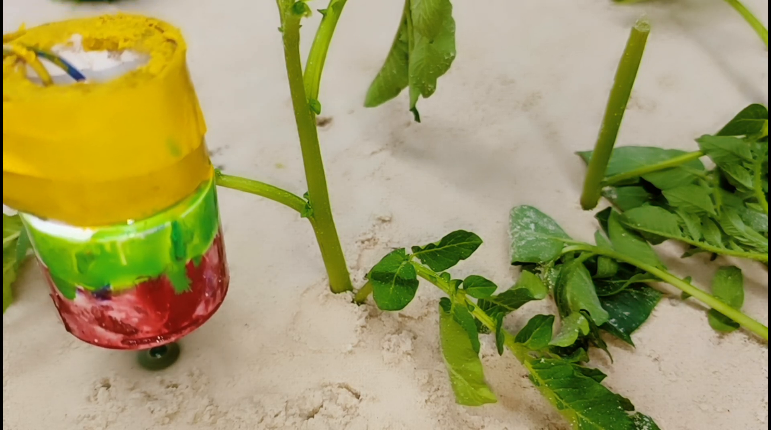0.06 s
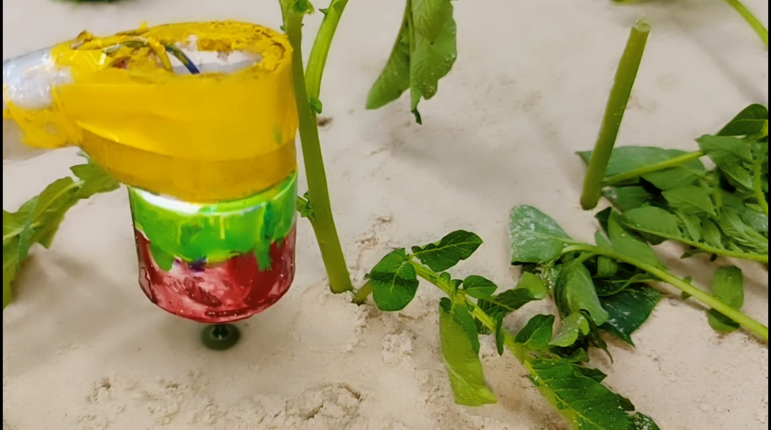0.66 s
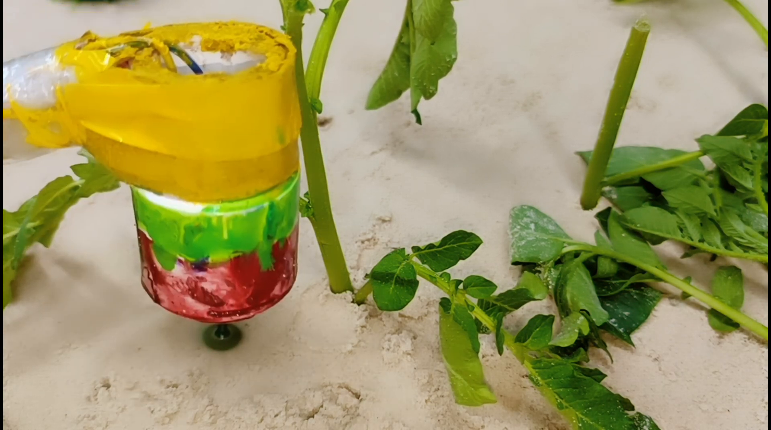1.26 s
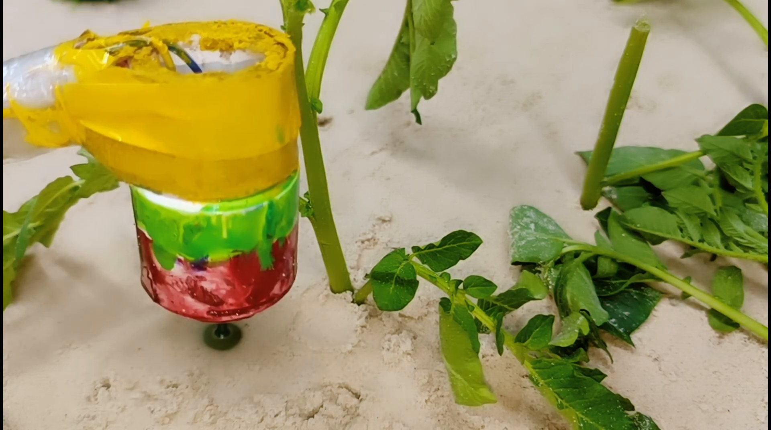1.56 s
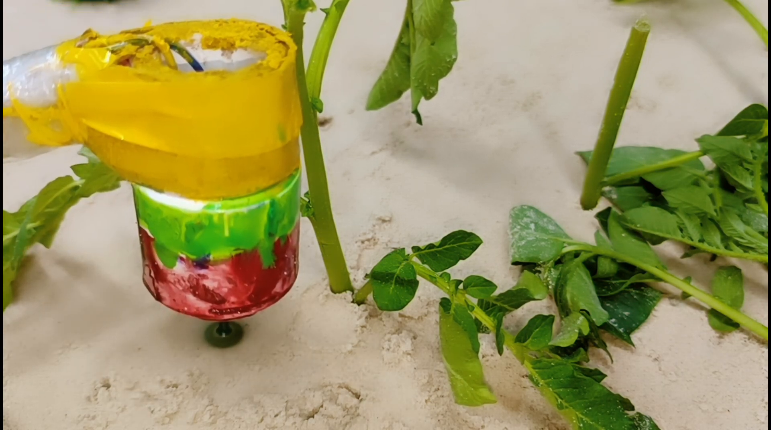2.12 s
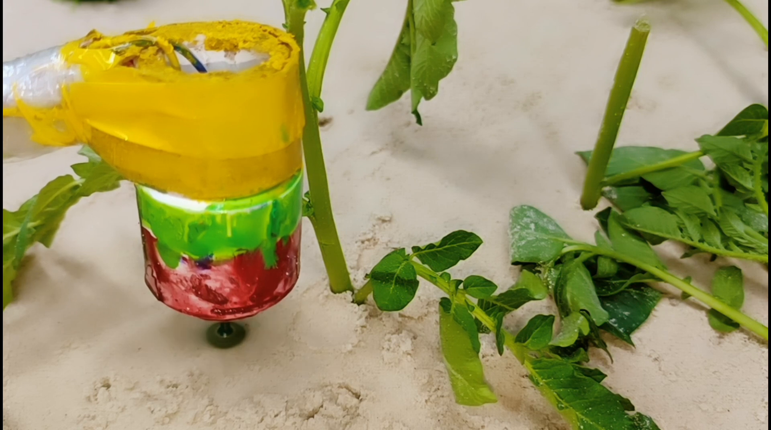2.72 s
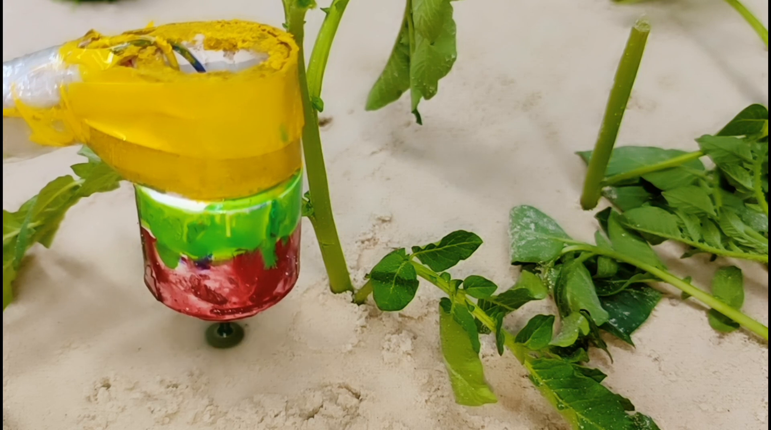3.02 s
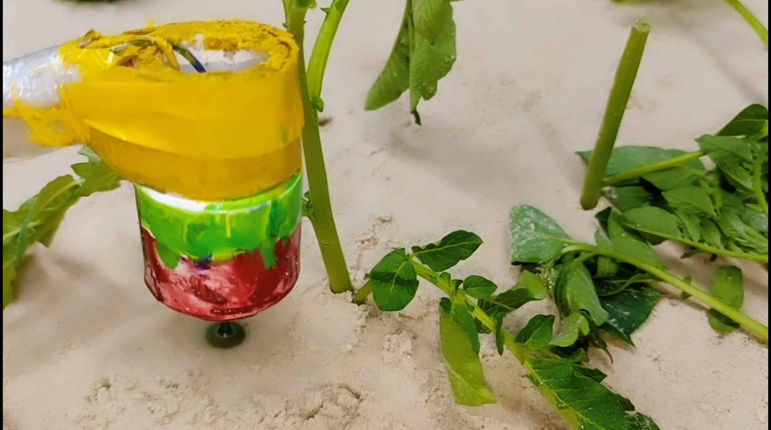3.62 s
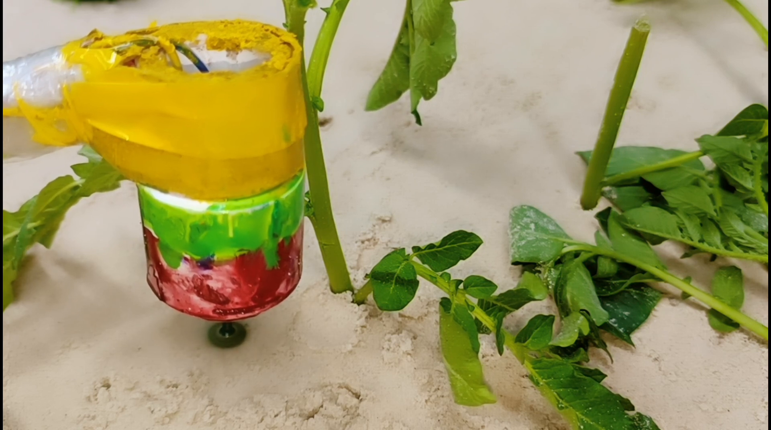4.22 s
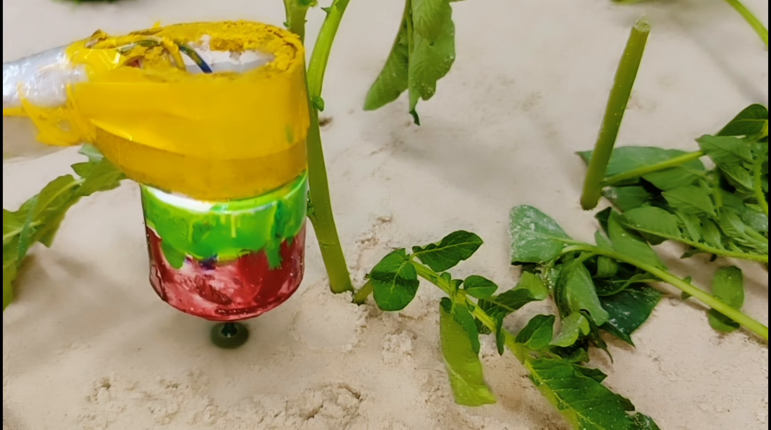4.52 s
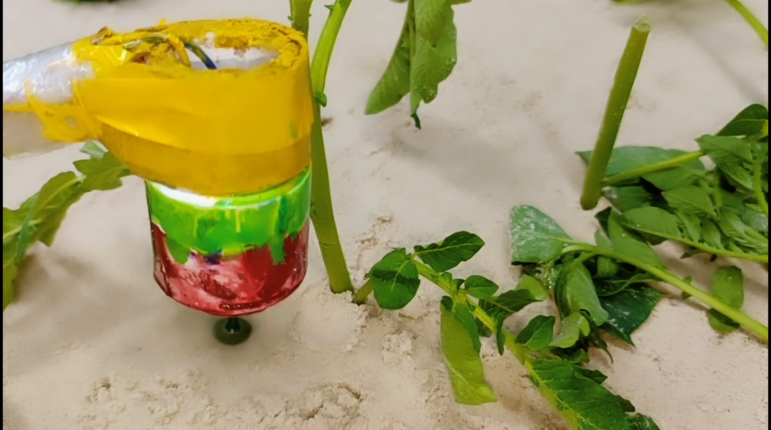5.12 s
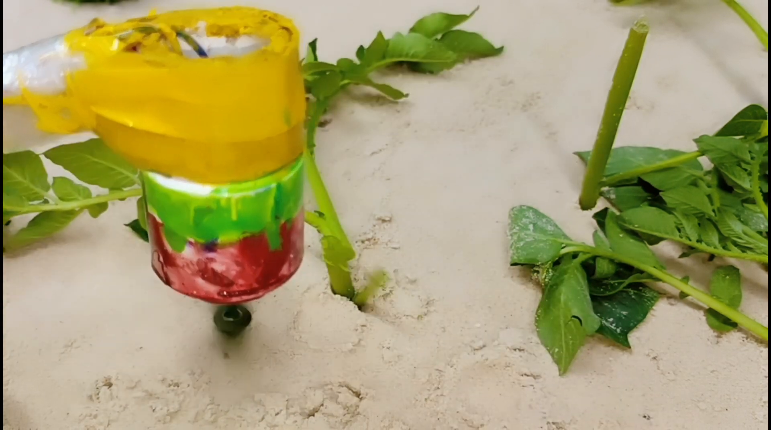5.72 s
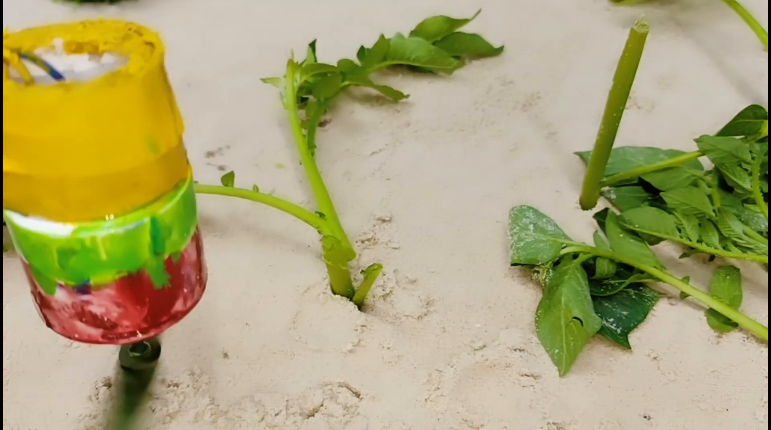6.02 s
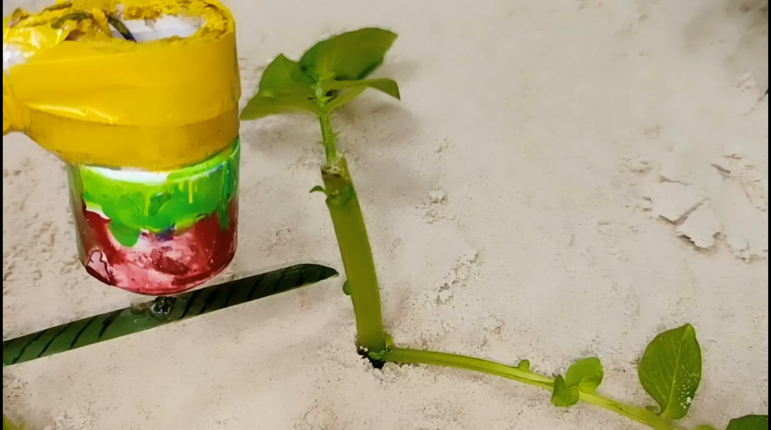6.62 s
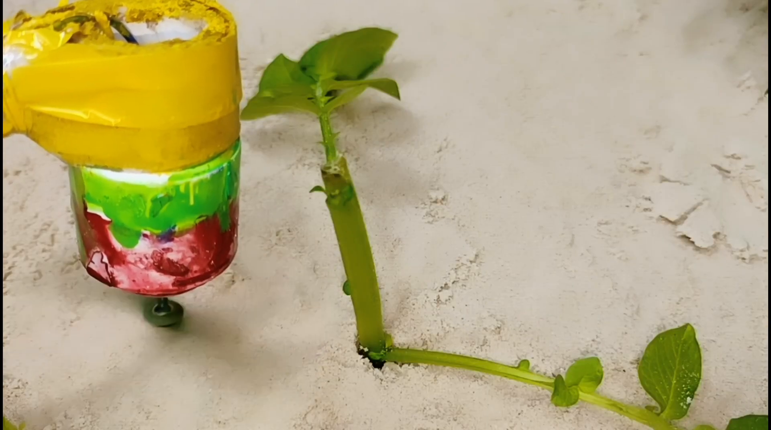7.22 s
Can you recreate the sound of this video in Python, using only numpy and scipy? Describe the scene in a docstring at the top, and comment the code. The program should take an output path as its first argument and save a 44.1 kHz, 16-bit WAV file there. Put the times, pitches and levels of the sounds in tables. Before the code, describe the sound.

Very close and with almost no echo, a spinning blade beats the air in a fast, even flutter while its little motor's gears whine and rattle. Then it bites into a plant stem and labours, slowing slightly as knocking and tiny squeals replace the whine. Everything stops abruptly for an instant, and the motor starts again, a raspy whirr climbing in pitch.

```python
"""A small geared motor swings a cutter blade close to the microphone: two thumps of air a turn, over a
gear whine and a rattling hiss. From about 4 s a plant stem drags on the blade: it slows, the first
thump dulls, the whine fades, and a knock and a squeal grow. Near 6.5 s the sound stops. After a short
silence the motor runs up again, its gear teeth and brushes making a bright, rough whirr."""
import sys
import numpy as np
from scipy import signal
from scipy.fft import rfft, irfft
from scipy.io import wavfile
from scipy.ndimage import uniform_filter1d

SR = 44100
rng = np.random.default_rng(int(sys.argv[2]) if len(sys.argv) > 2 else 0)


def to_wav(s):
    """Save 16-bit WAV."""
    ch = np.atleast_2d(s).T  # columns
    pcm = np.round(np.clip(ch, -1, 1) * 32767)  # PCM
    wavfile.write(sys.argv[1], SR, pcm.astype(np.int16))


N = 324576
T = np.arange(N) / SR
CUT_S, STOP_S, RESTART_S = 5.42, 6.468, 6.635
FREE_SPEED, LABOURED_SPEED = 16.42, 13.25  # turns a second at load 0 and at load 1
TEETH_PER_TURN, PINION_TEETH = 87.2, 9

# The blade's speed. Each row: time in seconds, turns a second.
BLADE_SPEED = [(0, 16.493), (1.729, 16.483), (2.825, 16.345), (4.083, 16.424), (4.964, 14.432),
               (5.412, 13.723), (5.892, 13.307), (6.47, 13.253)]

# Noise colours. Each row: frequency in Hz, relative level in dB.
WASH_COLOUR = [(20, 0), (70, 1), (130, -10), (175, -3), (220, -7.5), (290, -3.5), (550, -0.5), (780, -13),
               (1000, -11), (1250, -10), (2000, -21.5), (5000, -63)]  # stirred air
DRAUGHT_COLOUR = [(20, 4.5), (60, 2), (150, -16), (300, -13.5), (1000, -41)]  # wind on the microphone
RATTLE_COLOUR = [(500, -5.5), (840, -9), (940, 2), (1050, -2), (1700, -5.5), (2050, 1), (3050, -3),
                 (3380, 1), (3700, -5), (5000, -6.5), (7600, -8), (9000, -11), (11400, -13), (13000, -9),
                 (15500, -15)]  # clattering gears
RASP_COLOUR = [(800, -36), (1500, 12), (2000, 16), (3200, 9), (3900, -11.5), (7000, -26), (15000, -32)]  # rubbing gears
TICK_COLOUR = [(1200, -20), (2500, -12), (4200, 6.5), (5500, 7), (7500, -1), (9000, -15.5), (14000, -3)]  # gear play snapping shut
CHATTER_COLOUR = [(24, -30), (40, -2), (90, -5.5), (170, -10.5), (230, -15.5), (333, -3), (881, -12),
                  (998, -3.5), (1130, -8.5), (1490, -9.5), (1820, -12), (2400, -1), (3200, -9.5),
                  (3700, -6), (4200, -4), (4800, -7), (7400, -5.5), (7900, -7), (8400, -9), (13700, -10),
                  (15500, -18)]  # teeth in the run-up
BRUSH_COLOUR = [(3000, -30), (6000, -2), (9000, -2), (11800, -9), (13500, 7), (15500, -6)]  # motor brushes

# The rattle's stereo spread. Each row: frequency in Hz, left minus right in dB.
RATTLE_PAN = [(1000, 4), (2600, 0), (3600, -5), (4500, 2), (5700, 1.5), (7500, 6.5), (8600, -0.5),
              (12500, -0.5), (14000, -2.5)]
# Faders that ride the load. Each row: load from 0 to 1, base level in dB.
RATTLE_BY_LOAD = [(0, -27), (.3, -29), (.6, -27.5), (1, -26.5)]
CHIRPS_BY_LOAD = [(0, -36), (.3, -35), (.6, -32), (.9, -32.5), (1, -33)]
WHINE_BY_LOAD = [(0, -28.5), (.33, -31), (.52, -32), (.66, -54), (1, -38)]
# Ticks of the gear play. Each row: place in the turn, decay in turns, base level in dB.
TICKS = [(-.305, 0.019, -19), (.008, 0.011, -26)]
# Squeals in the stem. Each row: peak time in seconds, tooth rate in Hz, glide in % a ms, level in dB.
SQUEALS = [(4.83, 950, 0, -25), (5.0355, 1050, 1, -23), (5.089, 970, -5, -18.5), (5.1025, 760, 0, -23),
           (5.176, 990, 3.5, -13), (5.304, 880, -11, -22), (5.396, 980, 1, -19), (5.668, 907, -3, -16),
           (5.743, 949.3, -5.5, -16), (5.819, 940, -6, -15), (5.892, 1000, -2, -18),
           (5.967, 1000, -6, -12.5), (6.0426, 960, -7, -14), (6.1173, 980, -4.5, -13),
           (6.193, 965, -5.5, -14.5), (6.2686, 960, -3.5, -15), (6.343, 1020, -7, -10.5),
           (6.4187, 934, -8, -9)]
# A squeal's partials. Each row: multiple of the tooth rate, relative level in dB.
SQUEAL_HARMONICS = [(2, -6), (3, -4.5), (4, -12), (6, -14)]

# Puffs of air in the run-up. Each row: peak time in seconds, width in seconds, level in dB.
BUFFETS = [(6.66, 0.019, -20.5), (7.068, 0.0099, -19.5)]
# Run-up tones. Each row: multiple of the tooth rate, trim in dB under strain, trim in dB running free.
TOOTH_HARMONICS = [(1, -1.5, 1.5), (2, -0.5, 0.5), (3, -4.5, 1.5), (4, -6, 0), (5, -4, 0), (6, 1.5, 4),
                   (7, 0, 6), (8, -1, -1), (9, 1.5, -4)]
# The housing's EQ on those tones. Each row: frequency in Hz, gain in dB.
HOUSING_EQ = [(850, -16), (1000, 7.5), (1250, -2.5), (1600, -7), (1900, 0), (2300, -1.5), (2600, 4),
              (3300, 1), (3700, -2), (4300, 4), (4800, -7), (5200, 4), (5600, 2), (6100, -1.5),
              (7000, -0.5), (7900, 2), (8300, -8), (9000, -6), (14000, -14)]
# The shaft's hum. Each row: multiple of the shaft rate, level in dB at full speed.
SHAFT_HARMONICS = [(2, -37), (3, -40)]

# Hits ahead of the heavy thump. Each row: time in seconds, lead in ms, pitch in Hz, base level in dB.
LIGHT_THUMP = [(.8, 15.2, 535, -8.5), (2.5, 15.3, 562, -7.5), (4.13, 15.55, 557, -6),
               (4.24, 15.2, 280, -14), (4.68, 15.6, 356, -32), (4.95, 16, 402, -20), (5.2, 17, 430, -6.5),
               (5.45, 19, 530, -30), (5.78, 17.8, 526, -10.5), (6.15, 17.6, 504, -10.5)]  # dulls as the stem brakes the blade
AIR_SUCK = [(.8, 18, 184, -14), (4.1, 17.9, 192, -14.5), (4.24, 16.4, 264, -17), (4.68, 17.6, 263, -8.5),
            (4.95, 18.6, 250, -14), (5.2, 20, 270, -26), (5.45, 21.8, 360, -13.5), (5.78, 23.5, 303, -11),
            (6.15, 21.3, 286, -17.5)]  # the low pull of air that goes with it
STEM_KNOCK = [(4.7, 14, 450, -60), (4.95, 20.3, 450, -19), (5.2, 20.6, 413, -12), (5.45, 21, 442, -9.5),
              (5.78, 21.2, 413, -12), (6.15, 20.8, 400, -4.5)]  # the blade biting deep
# The stem's low thud in answer to the knock. Each row: time in seconds, level in dB.
STEM_THUD = [(5.4, -46), (5.7, -18.5), (6.1, -9.5)]
# Pushes of air. Each row, for a free blade: time after the heavy thump in ms, width in ms, level in dB.
AIR_PUSHES = [(-15.5, 2.9, -32), (-7, 2, -24), (-3.5, 0.99, -12), (9, 2, -20.5)]
# Slaps off nearby surfaces. Each row: delay in ms, gain in dB.
REFLECTIONS = [(9.3, -34.5), (11.6, -18.5), (13.8, -39)]


def undb(db):
    """Decibels to gain."""
    return 10 ** (np.asarray(db) / 20)


def read(table, at):
    """A two-column table, joined by straight lines."""
    return np.interp(at, *np.transpose(table))


def on_bins(points):
    """A curve over log frequency, read at every spectral bin."""
    hz, db = np.transpose(points)
    return np.interp(np.log(np.arange(N // 2 + 1) * SR / N + 1), np.log(hz), db)


def noise(colour):
    """Unrelated left and right noise of a given colour, rms 1."""
    x = irfft(rfft(rng.standard_normal((2, N))) * undb(on_bins(colour)), N)
    return x / x.std()


def opposed(amount):
    """Plus on the left, minus on the right."""
    return amount * np.array([[1], [-1]])


def pan_bands(x, pan):
    """Lean each band to the left or right."""
    return irfft(rfft(x) * undb(on_bins(pan) * opposed(.5)), N)


def blend(x, likeness):
    """Set the stereo width: the channels share part of their sound."""
    return (np.sqrt(1 + likeness) * x[0] + np.sqrt(1 - likeness) * opposed(x[1])) / np.sqrt(2)


def walk(rate):
    """A smooth random wobble of spread 1 that changes about rate times a second."""
    step = max(int(SR / rate), 2)
    x = uniform_filter1d(np.repeat(rng.standard_normal(N // step + 1), step), step)[:N]
    return x / x.std()


def bell(offset, width):
    """A bell-shaped envelope that peaks at offset 0."""
    return np.exp(-.5 * (offset / width) ** 2)


def swell(turn, place, width):
    """A bump once a turn; place and width in turns."""
    return bell((turn - place + .5) % 1 - .5, width)


def stroke(turn, place, rise, decay):
    """Once a turn a quick attack and a slower fall; all in turns."""
    since = (turn - place) % 1
    return (1 - np.exp(-since / rise)) * np.exp(-since / decay)


def repeat_each_turn(x, turn_hz, memory):
    """The same parts meet again on every turn, so part of their noise repeats; rms 1."""
    turns = np.cumsum(turn_hz) / SR
    out = [sum(memory ** n * np.interp(turns - n, turns, side, left=0) for n in range(4)) for side in x]
    return np.array(out) / np.std(out)


def glide(age, hz, percent_per_ms):
    """Phase of a tone that slides through hz at age 0."""
    return 2 * np.pi * hz * (age + 10 * percent_per_ms * age ** 2 / 2)


def ring(age, hz, decay_ms, rise_ms):
    """A heavily damped resonance: starts rise_ms before age 0, swells and dies within a few cycles."""
    decays = np.maximum(age * 1000 + rise_ms, 0) / decay_ms
    return (decays / 2) ** 2 * np.exp(2 - decays) * np.cos(2 * np.pi * hz * age)


def room(x, t60, wet_db):
    """Dense early reflections from the ground and nearby walls, with the lows rolled off."""
    age = T[:SR // 4]
    echoes = rng.standard_normal((2, len(age))) * undb(-60 * age / t60) * (age > .003)
    echoes = blend(echoes / np.sqrt(np.sum(echoes[0] ** 2)), likeness=.89)
    echoes = signal.sosfilt(signal.butter(2, 300, "highpass", fs=SR, output="sos"), echoes)
    return x + undb(wet_db) * signal.fftconvolve(x, echoes, axes=1)[:, :N]


def reflected(x):
    """Nearby surfaces slap each thump back, which firms up the same tones on every turn."""
    body = signal.sosfilt(signal.butter(1, 150, "highpass", fs=SR, output="sos"), x)
    return x + sum(undb(db) * np.interp(T - ms / 1000, T, body) for ms, db in REFLECTIONS)


def at_ports(x, lag_ms=.06):
    """The same sound at both microphone ports, the left one a little late."""
    return np.array([np.interp(T + side * lag_ms / 2000, T, x) for side in (-1, 1)])


def wash(turn, speed):
    """The bed: stirred air swells once a turn, much alike each pass; a draught rumbles on each port."""
    eddies = repeat_each_turn(noise(WASH_COLOUR), speed, memory=.7)
    level = undb(-28.5) + undb(-27.5) * swell(turn, place=-.05, width=.27)
    return blend(eddies, likeness=.99) * level + undb(-38) * noise(DRAUGHT_COLOUR)


def buffets():
    """Brief puffs of air on the microphone as the blade whips round."""
    puffs = sum(undb(db) * bell(T - s, width) for s, width, db in BUFFETS)
    return blend(noise(DRAUGHT_COLOUR), likeness=.49) * puffs


def chirps(count=2200):
    """A scatter of short sliding rings from the rubbing plastic, rms 1."""
    out = np.zeros((2, N))
    age = T[:SR // 40] - T[SR // 80]
    for when, pitch, slide, length, size, *phases in rng.random((count, 7)):
        start = int(when * (N - len(age)))
        phase = glide(age, hz=1450 + 1900 * pitch, percent_per_ms=6 * (slide - .55))
        shape = bell(age, .0015 + .003 * length) * undb(12 * size)
        out[:, start:start + len(age)] += shape * np.sin(phase + 2 * np.pi * np.array(phases)[:, None])
    return out / out.std()


def gear_rattle(turn, speed, load):
    """The gears buzz at the shaft rate and rattle in four strokes a blade turn."""
    strokes_db = 3.46 * stroke(4 * turn, place=-.18, rise=.13, decay=.34)
    strain_db = 3.64 * swell(turn, place=-.3, width=.075) + 3 * swell(turn, place=.015, width=.078)
    clatter = noise(RATTLE_COLOUR) * undb(.98 * walk(900))
    clatter = repeat_each_turn(clatter, speed * TEETH_PER_TURN / PINION_TEETH, memory=.25)
    clatter = pan_bands(blend(clatter, likeness=.025), RATTLE_PAN)
    return clatter * undb(read(RATTLE_BY_LOAD, load) + strokes_db + strain_db + .5 * walk(30))


def gear_rub(turn, load):
    """The gears rasp and chirp in two strokes, the first half a turn from the heavy thump."""
    rub = 2.42 * stroke(turn, place=-.515, rise=.02, decay=.16)
    rub += (.7 + .85 * load) * stroke(turn, place=-.29, rise=.014, decay=.23)
    # the rasp ducks under load, then creeps up deep in the cut
    rasp_db = -31 - 4 * load + 2 * np.maximum(T - CUT_S, 0) + 1.8 * walk(14)
    ringing = chirps() * undb(read(CHIRPS_BY_LOAD, load)) * (.6 + rub)
    return ringing + blend(noise(RASP_COLOUR), likeness=-.13) * rub * undb(rasp_db)


def ticks(turn, load):
    """The gear play snaps shut twice a turn; load keeps the teeth together and softens the tick."""
    snaps = sum(undb(db) * stroke(turn, place, rise=.0021, decay=fall) for place, fall, db in TICKS)
    return blend(noise(TICK_COLOUR), likeness=.43) * snaps * undb(-6 * load + 2 * walk(18))


def whine(turn, speed, load):
    """The meshing teeth sing a wavering tone with a weak octave; it ducks after each heavy thump."""
    tooth_hz = speed * TEETH_PER_TURN * (1 + .00568 * walk(90))
    phase = 2 * np.pi * np.cumsum(tooth_hz) / SR + opposed(.25)
    db = read(WHINE_BY_LOAD, load) + 1.5 * walk(50) - 3.5 * swell(turn, place=.24, width=.094)
    return np.sqrt(2) * undb(db) * (np.sin(phase) + undb(-16.5) * np.sin(2 * phase))


def squeal():
    """As the blade drags through the stem the teeth give short sliding squeals."""
    out = np.zeros((2, N))
    for s, hz, percent_per_ms, db in SQUEALS:
        near = slice(int(s * SR) - SR // 100, int(s * SR) + SR // 80)
        age = T[near] - s
        shape = undb(db) * bell(age, np.where(age < 0, .0013, .0042))  # fast attack, slower release
        phase = glide(age, hz, percent_per_ms) + opposed(.3)
        for k, partial_db in SQUEAL_HARMONICS:
            out[:, near] += shape * undb(partial_db) * np.sin(k * phase + rng.uniform(0, 2 * np.pi))
    return room(out, t60=.05, wet_db=-8.5)


def brushes(shaft):
    """The motor's brushes spit a bright hiss once a shaft turn."""
    return noise(BRUSH_COLOUR) * undb(-27.5 + 4 * np.cos(shaft) + 2.5 * walk(400))


def shaft_hum(shaft, speed_share):
    """The shaft's imbalance hums louder with speed."""
    hum = sum(undb(db + 5.6 * walk(30)) * np.sin(k * shaft) for k, db in SHAFT_HARMONICS)
    return hum * speed_share ** 2


def chatter(shaft, tooth_hz, ring_below_hz=5500):
    """Clattering teeth: the lower band rings at the tooth rate, the top stays a rasp."""
    clatter = repeat_each_turn(noise(CHATTER_COLOUR), tooth_hz / PINION_TEETH, memory=.25)
    lows = signal.sosfiltfilt(signal.butter(2, ring_below_hz, fs=SR, output="sos"), clatter)
    ringing = lows.std() * repeat_each_turn(lows, tooth_hz, memory=.33)
    db = -20.8 + .83 * np.cos(shaft) + 1.1 * walk(300)
    return blend(clatter - lows + ringing, likeness=.42) * undb(db)


def tooth_tones(shaft, tooth_hz, strain):
    """The pinion's wobble clusters sidebands round the tooth harmonics and makes them throb."""
    tones = np.zeros((2, N))
    on = T > RESTART_S - .04
    for k, strained_db, free_db in TOOTH_HARMONICS:
        db = (-27.6 + free_db + (strained_db - free_db) * strain + 2.4 * walk(20))[on]
        for sideband in (-2, -1, 0, 1, 2):
            multiple = k + sideband / PINION_TEETH
            line_db = db - 1 - (5 + 8 / k ** 2) * abs(sideband)
            flutter_db = 3.5 * walk(70)[on]
            housing_db = read(HOUSING_EQ, multiple * tooth_hz[on])
            phase = multiple * PINION_TEETH * shaft[on] + rng.uniform(0, 2 * np.pi)
            spread = opposed(.64 * np.sqrt(k) * walk(25)[on])  # higher harmonics sit wider
            tones[:, on] += undb(line_db + flutter_db + housing_db) * np.sin(phase + spread)
    return tones * undb(3.5 * np.cos(shaft / 2))


def run_up(start_hz=810, full_hz=2020, spin_up_s=.72, strain_s=.25):
    """The rotor's energy settles towards its top: the tooth rate climbs as the starting strain eases."""
    age = np.maximum(T - RESTART_S, 0)
    tooth_hz = np.sqrt(full_hz ** 2 - (full_hz ** 2 - start_hz ** 2) * np.exp(-age / spin_up_s))
    wavering_hz = tooth_hz * (1 + .007 * walk(350) + .006 * walk(40))
    shaft = 2 * np.pi * np.cumsum(wavering_hz) / SR / PINION_TEETH  # angle in radians
    tones = tooth_tones(shaft, tooth_hz, strain=np.exp(-age / strain_s))
    return tones + shaft_hum(shaft, tooth_hz / full_hz) + chatter(shaft, tooth_hz) + brushes(shaft)


def hit(age, table, s, decay_ms, rise_ms):
    """A damped ring whose lead, pitch and level are read from its table at time s."""
    times, *columns = np.transpose(table)
    lead_ms, hz, db = (np.interp(s, times, column) for column in columns)
    return undb(db) * ring(age + lead_ms / 1000, hz, decay_ms, rise_ms)


def air_pushes(age, load, braking):
    """Soft pushes of air round the heavy thump; braking strengthens them, load spreads them in time."""
    stretched_ms = 1000 * age * (1 - .16 * load)
    air = sum(undb(db) * bell(stretched_ms - ms, width) for ms, width, db in AIR_PUSHES)
    backflow = uniform_filter1d(air, size=SR // 60)
    return undb(2.5 * braking) * (air - backflow)


def heavy_thump(age, load, detune):
    """The main thump of air, with a bright edge; the motor's plastic cup rings on, more under load."""
    body = ring(age, hz=(466 - 4 * load) * (1 + detune), decay_ms=.81 + .059 * load, rise_ms=1.74)
    edge = undb(-14) * ring(age - .002, hz=1333, decay_ms=.72, rise_ms=2.3)
    cup = undb(-30.5 + 7 * load ** 2) * ring(age - .00928, hz=428, decay_ms=3, rise_ms=6.5)
    return undb(-2.5 + 1.7 * load) * (body + edge + cup)


def blade(turn, speed, load):
    """Each turn: a light thump and a suck of air, then the heavy thump. In the cut the stem knocks too."""
    out = np.zeros(N)
    slowing = uniform_filter1d(np.maximum(-np.gradient(speed), 0), size=SR // 5)
    braking = slowing / slowing.max()
    passes = np.interp(np.arange(int(turn[int(STOP_S * SR)]) + 1), turn, T)
    for s in passes:
        jitter, light_vary, knock_vary, pitch_vary, heavy_vary = rng.standard_normal(5)
        now = int(s * SR)
        near = slice(max(int((s - .04) * SR), 0), int((s + .03) * SR))
        age = T[near] - s
        loose_age = age + .00003 * jitter
        light = undb(.84 * light_vary) * hit(loose_age, LIGHT_THUMP, s, decay_ms=1.15, rise_ms=2.61)
        suck = hit(loose_age, AIR_SUCK, s, decay_ms=1.85, rise_ms=4.87)
        knock = undb(.7 * knock_vary) * hit(loose_age, STEM_KNOCK, s, decay_ms=.93, rise_ms=2.2)
        thud = undb(read(STEM_THUD, s)) * ring(loose_age + .01994, hz=226, decay_ms=1.9, rise_ms=4.5)
        heavy = undb(.5 * heavy_vary) * heavy_thump(age, load[now], detune=.01 * pitch_vary)
        out[near] += light - suck + knock - thud + heavy + air_pushes(age, load[now], braking[now])
    return room(at_ports(reflected(out)), t60=.12, wet_db=-32)


def scene():
    """The thumping run, paced by the blade's speed; silence; the run-up."""
    speed = read(BLADE_SPEED, T)
    turn = np.cumsum(speed) / SR - .967  # the heavy thump lands on whole turns
    load = np.clip((FREE_SPEED - speed) / (FREE_SPEED - LABOURED_SPEED), 0, 1)
    cutter = blade(turn, speed, load) + wash(turn, speed)
    cutter += gear_rattle(turn, speed, load) + gear_rub(turn, load)
    cutter += whine(turn, speed, load) + ticks(turn, load) + squeal()
    fade_out = np.clip((STOP_S - T) / .025 + .5, 0, 1)
    fade_in = undb(np.minimum(T - RESTART_S, 0) * 2900)
    return fade_out * cutter + fade_in * (run_up() + buffets())


def record(dry, low_cut_hz=66, top_hz=15600):
    """The output chain thins the deepest bass, rounds the highest peaks and cuts the top."""
    thin = signal.sosfilt(signal.butter(1, low_cut_hz, "highpass", fs=SR, output="sos"), dry)
    rounded = thin / (1 + thin ** 6) ** (1 / 6)
    return signal.sosfilt(signal.ellip(10, .2, 80, top_hz, fs=SR, output="sos"), rounded)


dry = scene()
out = record(dry)
to_wav(out)
```